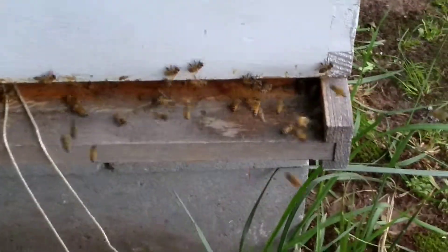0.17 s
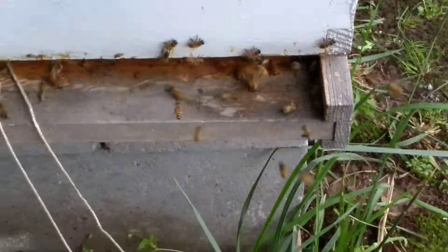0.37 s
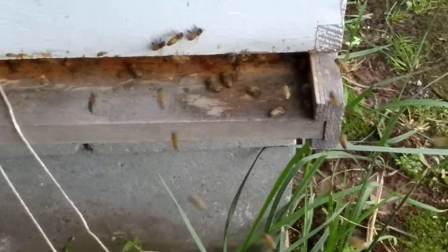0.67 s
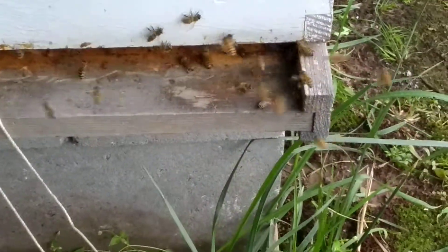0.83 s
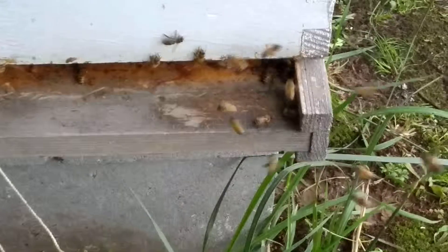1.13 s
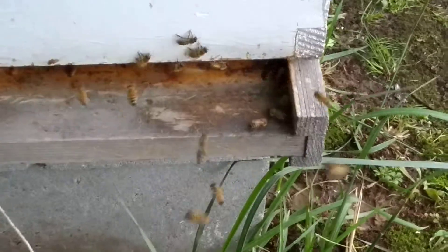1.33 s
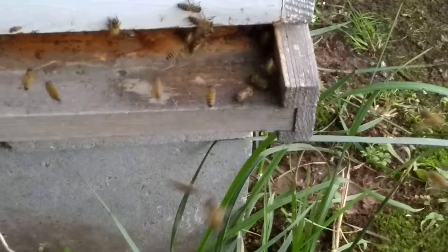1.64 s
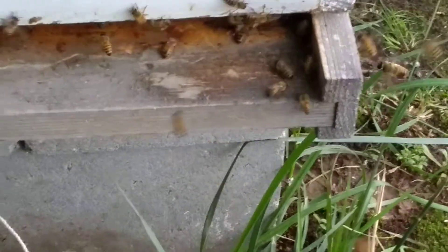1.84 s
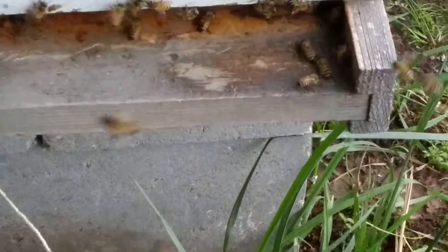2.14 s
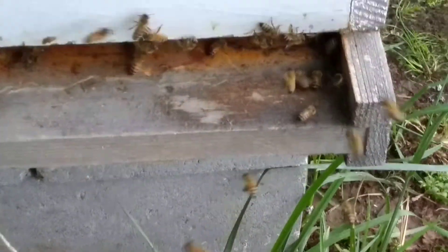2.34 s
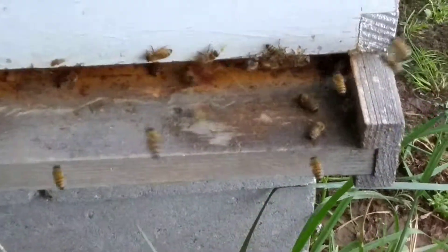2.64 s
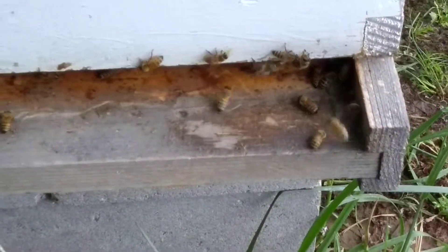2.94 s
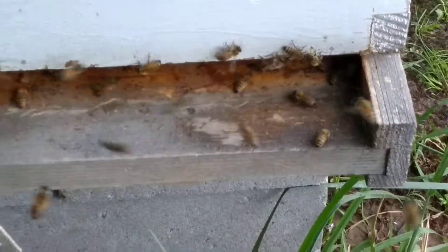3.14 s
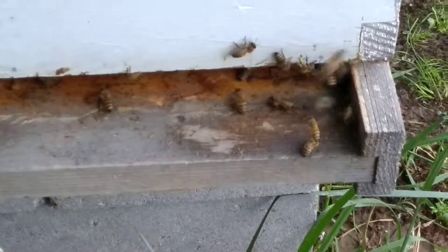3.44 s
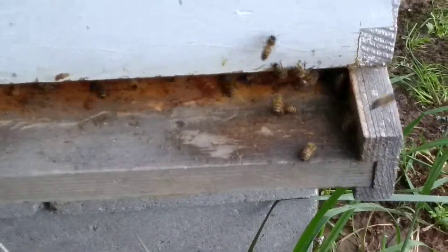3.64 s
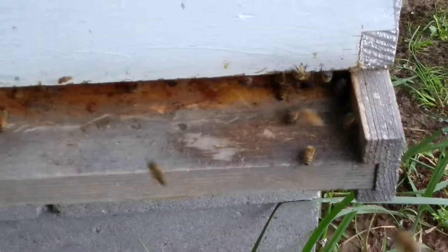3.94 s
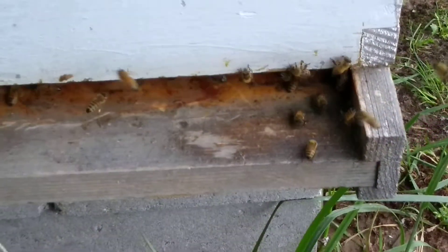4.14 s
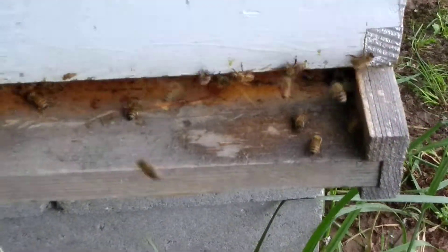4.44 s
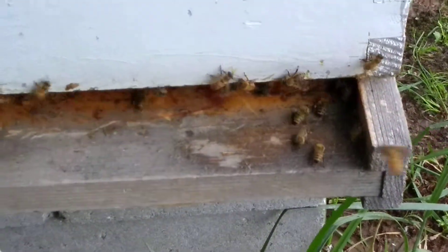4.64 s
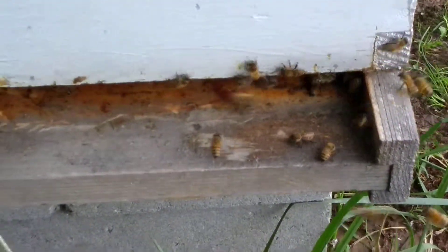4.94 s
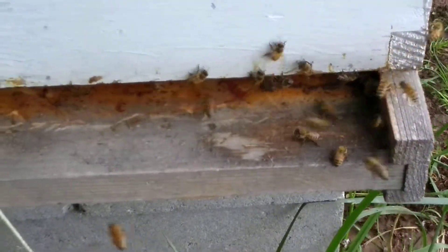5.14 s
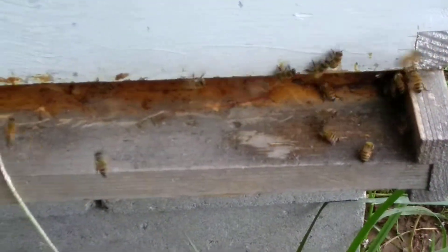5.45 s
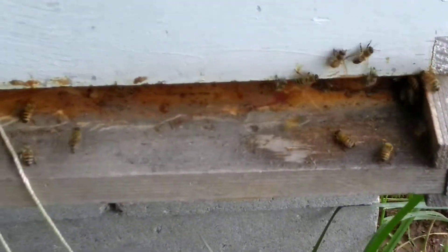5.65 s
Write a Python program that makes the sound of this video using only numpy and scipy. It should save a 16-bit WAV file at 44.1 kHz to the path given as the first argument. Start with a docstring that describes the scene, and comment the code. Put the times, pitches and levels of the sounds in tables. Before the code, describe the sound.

Honeybees hum throughout at a garden hive entrance, close to a hand-held phone and slightly right, over a faint outdoor wash and hiss. A distant low drone fades out by about 1.3 seconds. From 0.3 to 1.8 seconds fingers tap, bump and rub the case, while low gusts rumble mainly on the left. A nearby songbird peeps at 0.7 seconds, then alternates a slurred whistle and a short raspy warble roughly every half second, loudest around 2.3, 2.9, 4.1 and 4.9 seconds. Single bees buzz close past, most clearly at 2.7, 4.1, 5.0 and 5.3 seconds. The hum and garden background swell slowly, drop back quickly at 1.6 and 3.5 seconds, then rise again and stay up. A few dull taps land between 3.5 and 4.3 seconds. The bird gives a sharp chip at 5.3 seconds, and a last gust puffs at 5.8.

```python
"""A hive entrance in a garden, from a hand-held phone just above the landing board; honeybees hum throughout.
At first a far-off drone fades while fingers tap and rub the case and low gusts reach mainly the left port.
Within a second a songbird starts up nearby, then alternates two phrases as single bees pass close.
Hum and garden swell and drop back twice, then stay up; a few late taps, a chip from the bird, a last gust.
The phone widens its two microphone ports into stereo by feeding each, late and inverted, into the other."""
import sys
import numpy as np
from scipy import signal
from scipy.fft import rfft, irfft
from scipy.io import wavfile

SR = 44100
rng = np.random.default_rng(int(sys.argv[2]) if len(sys.argv) > 2 else 0)


def file_out(sig):
    """Save sig as 16-bit WAV at sys.argv[1]."""
    # one column per channel
    cols = np.atleast_2d(sig).T
    # limit, then scale
    lim = np.clip(cols, -1, 1)
    pcm = np.round(lim * 32767).astype(np.int16)
    wavfile.write(sys.argv[1], SR, pcm)


N = 255780
TIME = np.arange(N) / SR
FREQ = np.fft.rfftfreq(N, 1 / SR)

# single bees passing the microphone: nearest_s, half_length_s, wingbeat_hz, level_db (before the swells),
# side (-1 left to 1 right)
BEE_PASSES = [(1.19, 0.23, 221, -69, 0.31), (2.66, 0.18, 238.1, -51, 0.58), (2.87, 0.069, 230, -61, 0.56),
              (3.275, 0.13, 238.4, -66, 0.46), (4.145, 0.187, 216.8, -50.5, 0.38),
              (4.984, 0.12, 225.4, -49.5, 0.59), (5.287, .18, 215.8, -50, 0.22)]
# tone colour of a wing stroke: frequency_hz, gain_db
WING_SPECTRUM = [(220, 2), (470, 2.5), (720, -11.5), (1200, -9), (2000, -15), (3300, -15.5), (4500, -23.5)]
# the bird's notes, by phrase: onset_s, attack_s, length_s, start_hz, end_hz, gain_db, rasp (0 to 1)
PHRASE_NOTES = { "slur": [(-.007, 0.021, 0.058, 2666, 2754, -8.5, 0.11),
                (.047, 0.011, .03, 2725, 3700, -9, 1), (.06, .025, .068, 3800, 2878, -1, 0.61),
                (.108, .01, .035, 2650, 1970, -11, 0.36), (.136, 0.02, 0.068, 2200, 2215, -7, .03)],
                "warble": [(-.016, 0.013, 0.0345, 2917, 3317, -10, 0.86),
                (-.008, 0.052, 0.072, 3268, 3310, 0, 0.09), (.042, .008, .024, 3600, 3196, -0.5, 0.95),
                (.052, 0.0072, .055, 2585, 2080, -7, 0.3), (.106, .016, .095, 3020, 2475, -4, .22),
                (.193, 0.017, 0.058, 2107, 2084, -10, 0.08)],
                "peep": [(-.003, .02, .056, 3074, 3036, 5, 0.03),
                (.08, 0.014, 0.144, 2450, 2320, -8.5, 0.2)], "pip": [(.005, .03, .075, 3307, 3326, 9, .08)],
                "chip": [(0, .015, 0.049, 3150, 3390, -2, 1), (.01, 0.024, .115, 3600, 3980, 1.5, 0.88)]}
# the phrases as sung: start_s, phrase, voice_db
BIRD_SONG = [(0.661, "peep", -45.5), (1.198, "slur", -39), (1.669, "warble", -43), (2.3, "slur", -34),
             (2.891, "warble", -32.5), (3.331, "pip", -47.5), (3.542, "warble", -41), (4.142, "slur", -34),
             (4.897, "warble", -33.5), (5.324, "chip", -43.5)]
# scatter from near and far trees: gain_db, t60_s
TREE_SCATTER = [(-4, .09), (-7.5, .45)]
# finger taps and bumps on the case: start_s, level_db, ring_hz (nominal), click_db (relative to the tap)
FINGER_TAPS = [(0.2696, -21.5, 550, -11), (0.3752, -13.5, 290, -20), (.392, -21, 496, -19),
               (.404, -23.5, 470, -1), (0.434, -15.5, 173, -22), (0.498, -6.5, 300, -10),
               (0.547, -16.5, 131, -31), (.585, -18, 254, -11), (0.716, -12, 237, -16.5),
               (0.8145, -8, 317, -14.5), (.99, -17, 113, -16.5), (1.188, -11.5, 86.3, -45),
               (1.389, -15.5, 78, -45), (1.553, -6.5, 308.2, -20.5), (1.568, -7, 192, -27),
               (1.597, -24, 200, -24), (1.846, -22.5, 430, -12), (3.534, -12, 101, -38),
               (3.9858, -10, 248, -43), (4.311, -15, 111, -50), (4.331, -11.5, 105, -48)]
# a finger sliding on the case: peak_s, half_length_s, level_db
FINGER_RUBS = [(0.391, 0.031, -44), (.423, .009, -36), (0.509, 0.012, -37), (0.574, 0.037, -30.5),
               (0.723, 0.0083, -35.5), (0.894, 0.04, -37)]
# skin against the case: frequency_hz, gain_db
SKIN_SPECTRUM = [(60, 0), (250, 4), (600, 0), (1200, -6), (2200, -4), (3500, -8), (5000, -14),
                 (7500, -19.5), (9500, -29), (14000, -40)]
# wind at the ports, from long stirs to short puffs: peak_s, half_length_s, level_db
WIND_GUSTS = [(.38, 0.03, -29), (.56, 0.053, -31), (.71, 0.062, -28), (.98, 0.044, -22), (1.16, 0.072, -21),
              (1.3, 0.034, -27), (1.54, 0.05, -22), (1.9, .15, -32), (2.44, 0.067, -35), (2.7, 1, -35),
              (3.09, 0.025, -29), (3.42, 0.052, -34), (4.35, .08, -28.5), (5.04, 0.032, -30), (5.1, 1, -37),
              (5.38, 0.044, -34), (5.79, 0.04, -23)]
# rumble of air in a port: frequency_hz, gain_db
WIND_SPECTRUM = [(10, -1), (35, 2), (70, 2), (120, -4.5), (220, -21.5), (450, -31.5), (1200, -53),
                 (4000, -78)]
# distant garden wash: frequency_hz, gain_db
GARDEN_SPECTRUM = [(20, -5.5), (85, 5), (160, -1), (340, -13), (600, -18), (1300, -24), (1850, -26),
                   (2150, -24.5), (2750, -24), (3400, -26), (4300, -29), (6000, -38), (10000, -45.5)]
# swells of bees and garden: start_s, rise_s, end_s, height_db
OUTDOOR_SWELLS = [(.1, .9, 1.58, 4), (1.85, 0.86, 3.53, 9.5), (3.55, 0.73, 6.0, 7.5), (4.55, 0.4, 5.02, 4)]
# microphone hiss, left then right: level_db (before the swells)
MIC_HISS_DB = [
    [-59],
    [-50],
]

PORT_DELAY_S = .000443  # travel time from one port to the other


def swarm(count=18, beat_hz=233, weave_db=3.5, side=0.48, side_spread=0.24, db=-45):
    """Foragers hovering at the entrance, each with its own pitch, weaving nearer and further."""
    pitches = beat_hz * (1 + .13 * np.linspace(-1, 1, count))
    sides = side + side_spread * (2 * rng.random(count) - 1)
    bees = (ports(wingbeat(hz) * undb(weave_db * walk(2.5)), where) for hz, where in zip(pitches, sides))
    return level(sum(bees), db)


def flybys(sag=.012):
    """A bee close to the microphone grows as one over its distance; its pitch sags as it goes by."""
    out = 0
    for nearest_s, half_length_s, hz, db, side in BEE_PASSES:
        along = (TIME - nearest_s) / half_length_s
        distance = np.hypot(1, along)
        buzz = wingbeat(hz * (1 - sag * along / distance), wander=.01)
        out = out + ports(buzz * undb(db) / distance * np.exp(-(along / 3) ** 2), side)
    return out


def wingbeat(hz, wander=.03):
    """One bee: a push of air on every stroke, the rate wavering as it steers."""
    phase = np.cumsum(hz * (1 + wander * walk(5) + .009 * walk(35))) / SR
    harmonics = np.arange(1, 21)
    cycle = np.linspace(0, 1, 1024)
    offsets = rng.random((len(harmonics), 1)) / 2
    partials = np.sin(2 * np.pi * (np.outer(harmonics, cycle) + offsets))
    stroke = response(WING_SPECTRUM, harmonics * np.mean(hz)) @ partials
    return level(np.interp(phase % 1, cycle, stroke), 0)


def bird(rasp_depth=0.0704, rasp_hz=330, full_voice_db=-33, soft_tilt=1.28, middle_hz=2750, direct_db=-2):
    """A near-pure whistle a little to the left, shaken in pitch on raspy notes and scattered by trees."""
    voice = np.zeros(N)
    shake = walk(rasp_hz)
    for start_s, phrase, voice_db in BIRD_SONG:
        for onset_s, attack_s, length_s, start_hz, end_hz, note_db, rasp in PHRASE_NOTES[phrase]:
            t = TIME - start_s - onset_s
            on = (t > 0) & (t < length_s)
            hz, effort = note(t[on], attack_s, length_s, start_hz, end_hz)
            # a soft phrase loses its high notes first
            tilt_db = soft_tilt * (voice_db - full_voice_db) * np.log2(hz / middle_hz)
            phase = np.cumsum(hz * (1 + (rasp_depth * rasp + 0.0049) * shake[on])) / SR
            whistle = np.sqrt(2) * np.sin(2 * np.pi * phase)
            voice[on] += undb(voice_db + note_db + tilt_db) * effort * whistle
    scatter = sum(undb(db) * tree_echoes(voice, t60_s) for db, t60_s in TREE_SCATTER)
    return undb(direct_db) * ports(voice, side=-0.18) + scatter


def note(t, attack_s, length_s, start_hz, end_hz, release_s=0.015, ease=1.6):
    """Pitch and effort of one note: a glide that starts fast and settles, under attack, hold, release."""
    hz = end_hz + (start_hz - end_hz) * np.clip(1 - t / length_s, 0, 1) ** ease
    effort = np.clip(np.minimum(t / attack_s, (length_s - t) / release_s), 0, 1)
    return hz, np.sin(np.pi / 2 * effort) ** 2


def tree_echoes(x, t60_s):
    """Dense, dying scatter from trees all round."""
    tails = rng.standard_normal((2, SR)) * undb(-60 * TIME[:SR] / t60_s)
    return diffuse(*(signal.fftconvolve(x, tail / np.linalg.norm(tail))[:N] for tail in tails))


def handling(grain_db=1.0, far_port_db=-8):
    """Taps, grainy rubs and gusts act on the left port; the right one gets weaker gusts of its own."""
    rubs = noise(SKIN_SPECTRUM) * humps(FINGER_RUBS) * undb(grain_db * walk(250))
    left_wind, right_wind = gusts(), gusts()
    return np.array([taps() + rubs + left_wind, undb(far_port_db) * right_wind])


def taps(ring_cycles=0.51, relax=0.54, soft_cycles=0.36, click_s=0.0019):
    """Each tap pumps the air in the port: one or two swings that slow as they die, and a dry click."""
    out, t = np.zeros(N), TIME[:SR // 10]
    grit = noise(SKIN_SPECTRUM)
    for start_s, db, ring_hz, click_db in FINGER_TAPS:
        cycles = ring_hz * t
        swing = np.sin(2 * np.pi * (relax * cycles + (1 - np.exp(-2 * cycles)) / 2))
        # the pad of the finger gives, so the push starts smoothly
        push = swing * (1 - np.exp(-(cycles / soft_cycles) ** 2)) * np.exp(-cycles / ring_cycles)
        span = slice(int(start_s * SR), int(start_s * SR) + len(t))
        click = undb(click_db) * grit[span] * np.exp(-t / click_s)
        out[span] += undb(db) * (click - push / np.abs(push).max())
    return out


def gusts(flutter_db=3.0):
    """Wind on one port: a low, unsteady rumble that comes and goes."""
    rumble = noise(WIND_SPECTRUM) * undb(flutter_db * walk(7.2))
    return level(rumble, 0) * humps(WIND_GUSTS)


def garden(db=-36.5, flicker_db=1.28):
    """Distant outdoor wash from all round, gently uneven."""
    washes = (noise(GARDEN_SPECTRUM) * undb(flicker_db * walk(16.3)) for _ in range(2))
    return level(diffuse(*washes), db)


def drone(hz=101.5, db=-39.5, fade_s=1.0):
    """A far-off low tone that fades early on."""
    tone = np.sin(2 * np.pi * np.cumsum(hz * (1 + 0.0034 * walk(5.1))) / SR)
    return level(tone, db) * np.exp(-(TIME / fade_s) ** 4)


def hiss(follow=0.92, flicker_db=1.0):
    """White microphone hiss, stronger on the right, that swells with the background."""
    drift_db = follow * swell_db() + flicker_db * walk(13)
    return rng.standard_normal((2, N)) * undb(MIC_HISS_DB) * undb(drift_db)


def swell_db(lull_db=-8, drop_s=0.049):
    """Gain of the outdoors: each swell climbs slowly from a lull, holds and drops quickly."""
    gain_db = lull_db
    for start_s, rise_s, end_s, height_db in OUTDOOR_SWELLS:
        climb = np.clip((TIME - start_s) / rise_s, 0, 1)
        drop = np.clip(.5 + (end_s - TIME) / drop_s, 0, 1)
        gain_db = gain_db + height_db * climb * drop
    return gain_db


def ports(x, side):
    """A source off to one side reaches the far port later."""
    lag_s = side * PORT_DELAY_S * np.array([[.5], [-.5]])
    return irfft(rfft(x) * np.exp(-2j * np.pi * FREQ * lag_s), N)


def diffuse(a, b):
    """Sound from all round: alike at both ports in the bass, unrelated higher up."""
    alike = np.sinc(2 * FREQ * PORT_DELAY_S)
    mid = rfft(a) * np.sqrt((1 + alike) / 2)
    side = rfft(b) * np.sqrt((1 - alike) / 2)
    return irfft(np.array([mid + side, mid - side]), N)


def humps(rows):
    """Summed gain of events that each swell and fade round a peak."""
    return sum(undb(db) * np.exp(-((TIME - peak_s) / half_s) ** 2) for peak_s, half_s, db in rows)


def walk(rate_hz):
    """Smooth random wander of unit spread, rolling off above rate_hz."""
    return level(irfft(rfft(rng.standard_normal(N)) / (1 + (FREQ / rate_hz) ** 4), N), 0)


def noise(spectrum):
    """Noise of unit level with the given spectrum."""
    return level(irfft(rfft(rng.standard_normal(N)) * response(spectrum, FREQ), N), 0)


def response(spectrum, hz):
    """Gain of a spectrum at the given frequencies."""
    points_hz, db = np.transpose(spectrum)
    return undb(np.interp(np.log(np.maximum(hz, 1)), np.log(points_hz), db))


def level(x, db):
    """Scale to an rms level."""
    return x * undb(db) / np.sqrt(np.mean(x ** 2))


def undb(db):
    """Decibels to gain."""
    return 10 ** (np.asarray(db) / 20)


def scene():
    """The sound at the two ports, just above the landing board."""
    outdoors = (swarm() + flybys() + garden()) * undb(swell_db())
    return outdoors + drone() + bird() + handling()


def record(dry, cross_top_hz=6500, top_hz=14380):
    """Each channel takes away a late copy of the other port below the treble; hiss joins; the top is cut."""
    late = .96 * np.exp(-2j * np.pi * FREQ * PORT_DELAY_S)
    crossfeed = late / (1 + (FREQ / cross_top_hz) ** 6)
    spectrum = rfft(dry)
    fade_in = np.minimum(TIME / .01, 1) ** 2
    wide = irfft(spectrum - crossfeed * spectrum[::-1], N) * fade_in
    lowpass = signal.ellip(12, .1, 70, top_hz, fs=SR, output="sos")
    return signal.sosfilt(lowpass, wide + hiss())


dry = scene()
out = record(dry)
file_out(out)
```